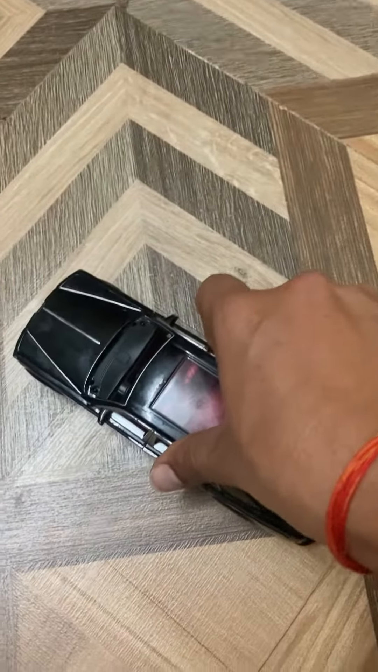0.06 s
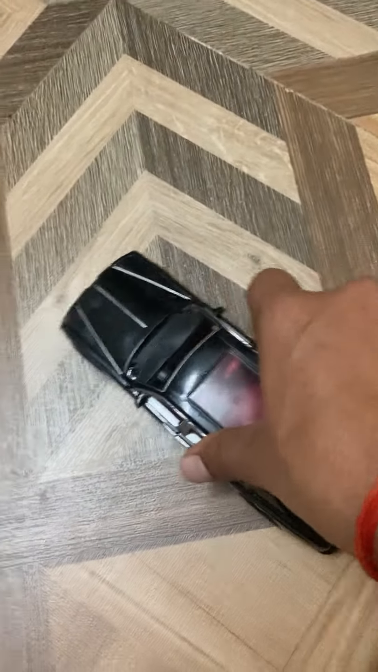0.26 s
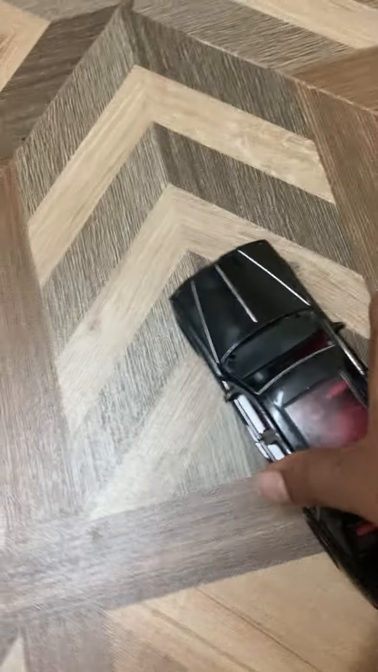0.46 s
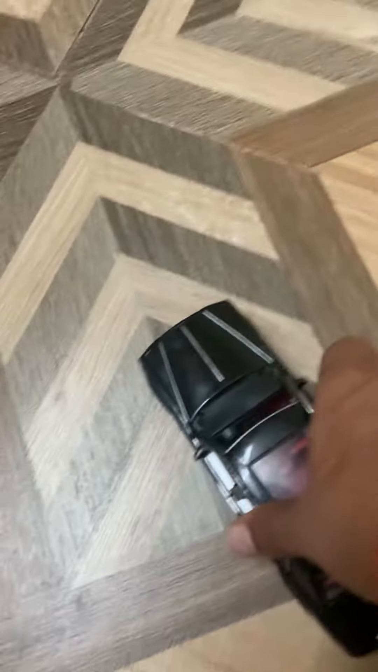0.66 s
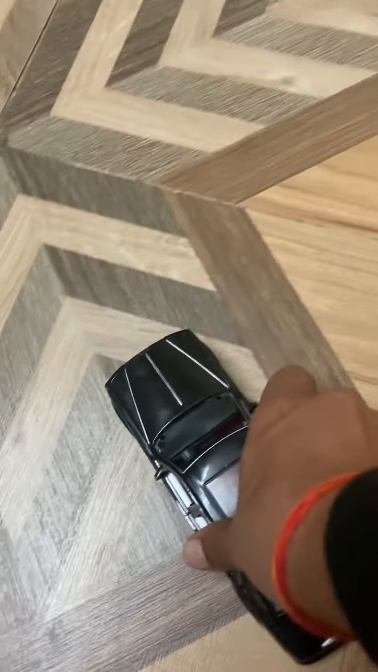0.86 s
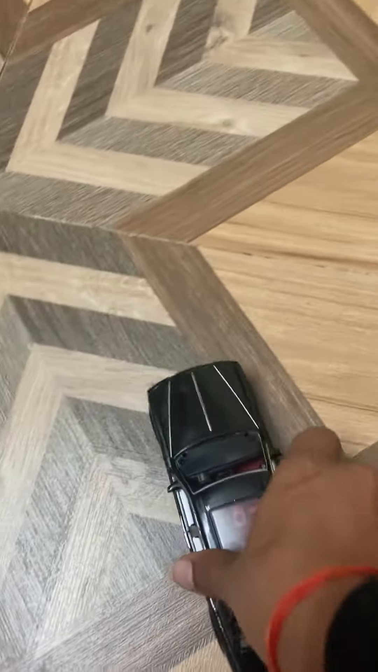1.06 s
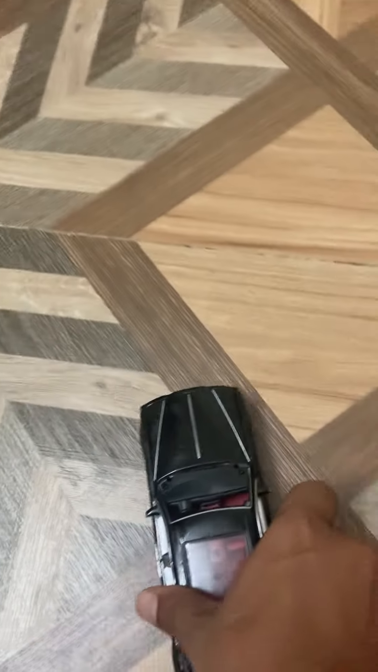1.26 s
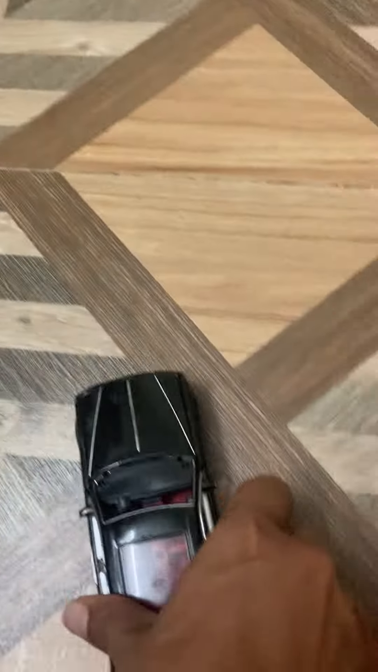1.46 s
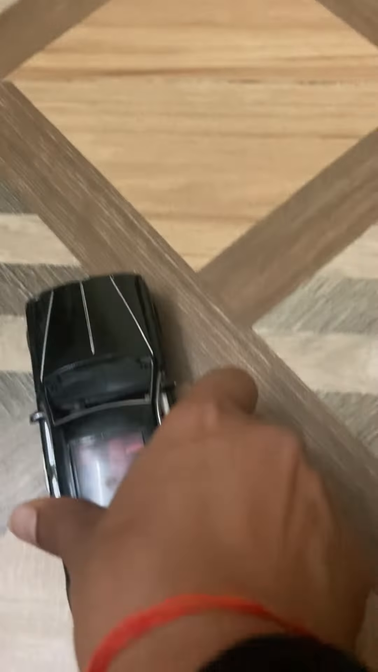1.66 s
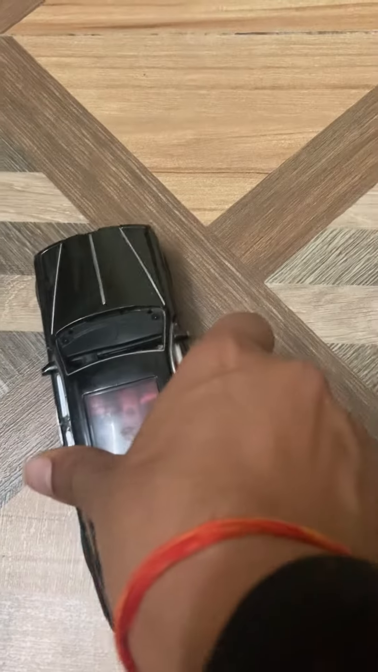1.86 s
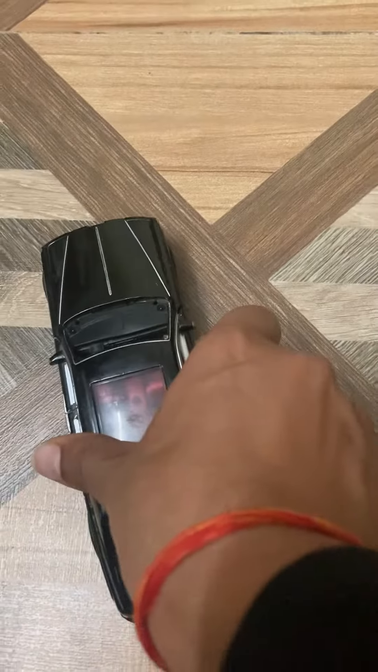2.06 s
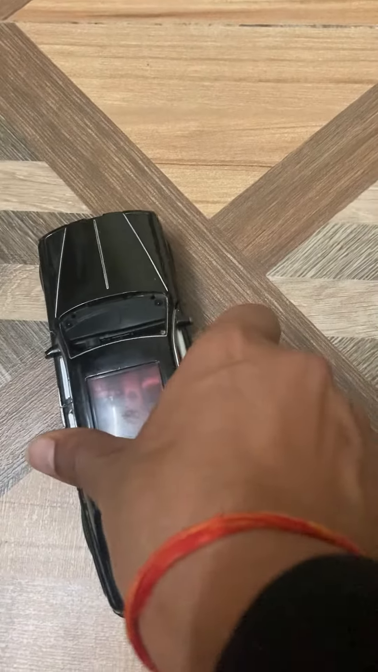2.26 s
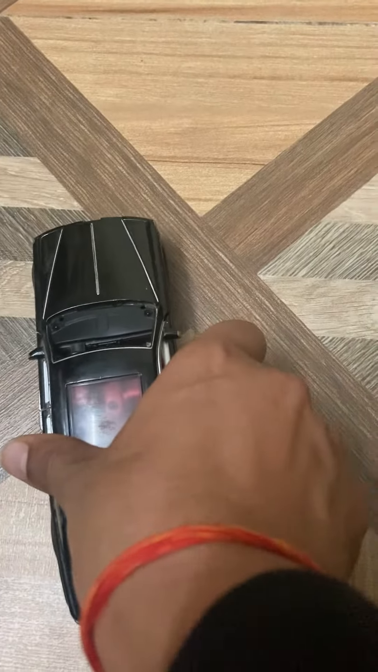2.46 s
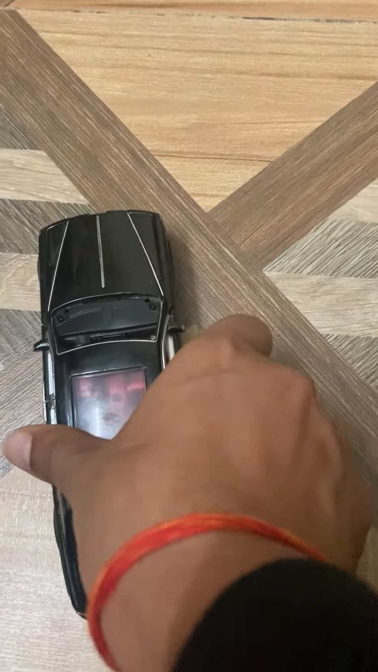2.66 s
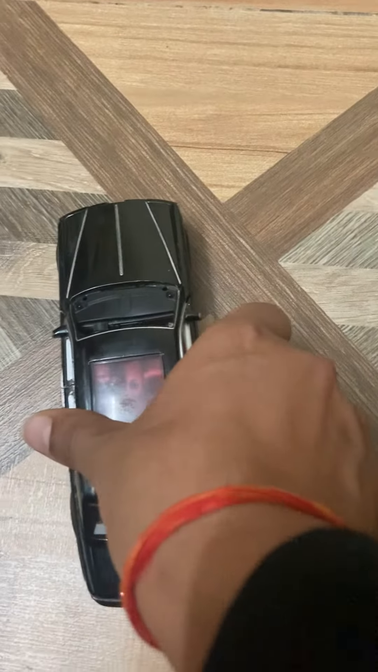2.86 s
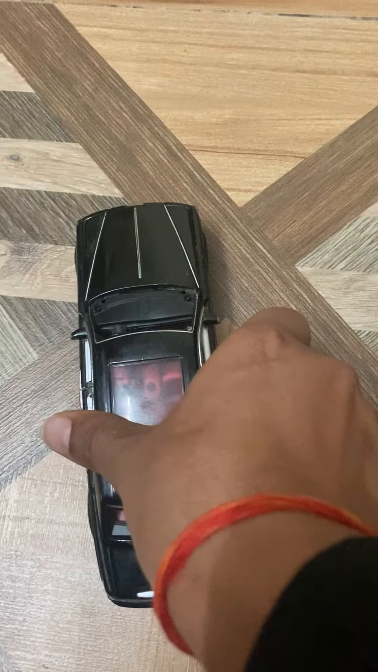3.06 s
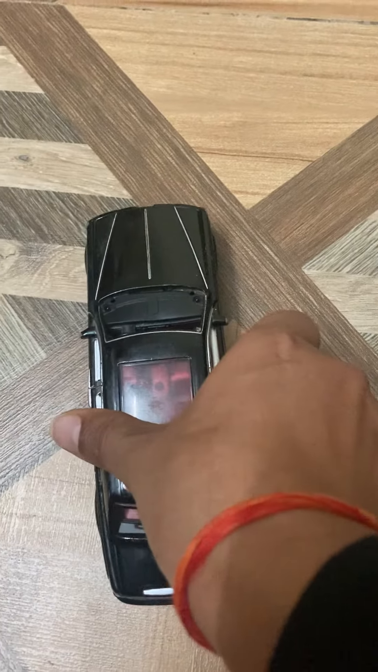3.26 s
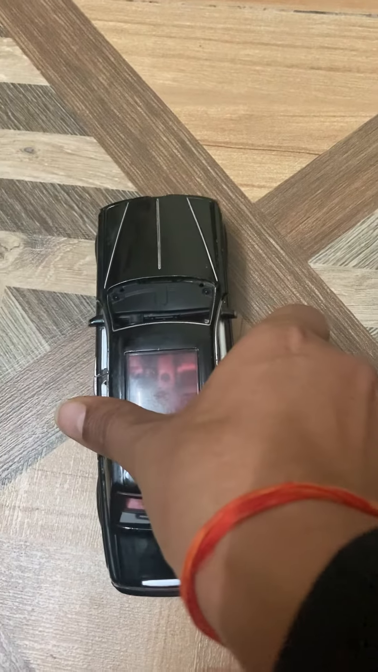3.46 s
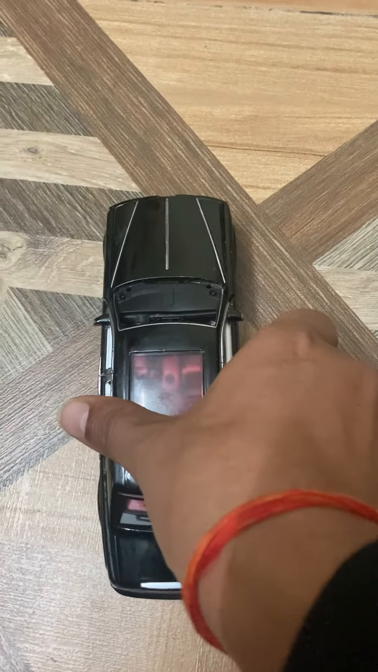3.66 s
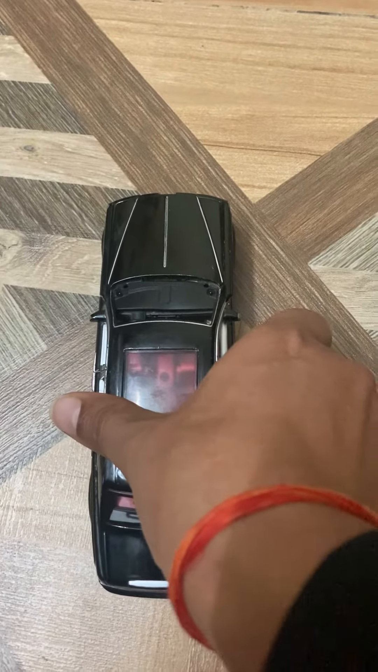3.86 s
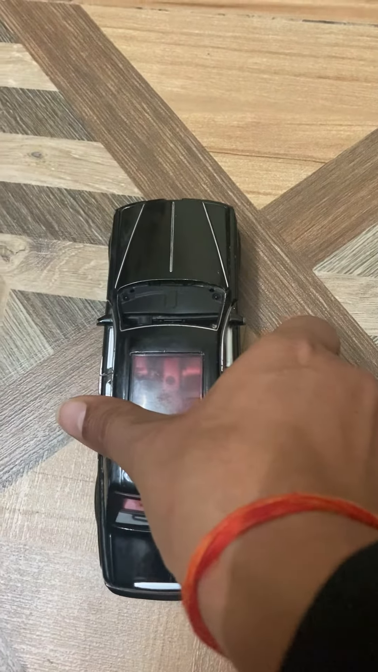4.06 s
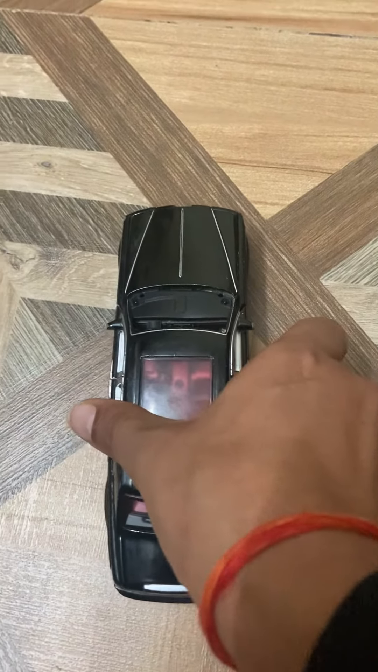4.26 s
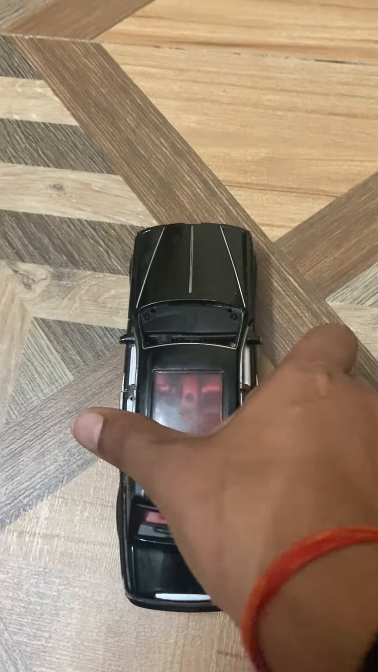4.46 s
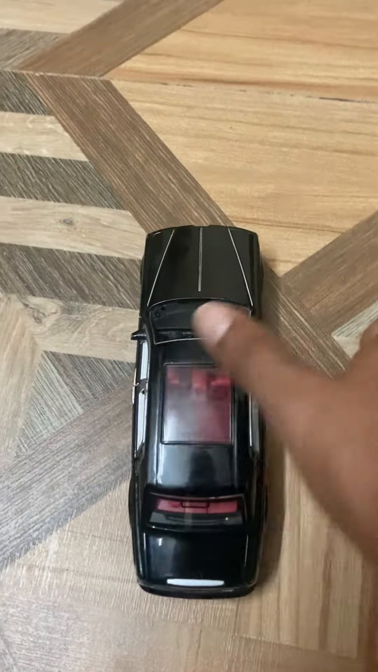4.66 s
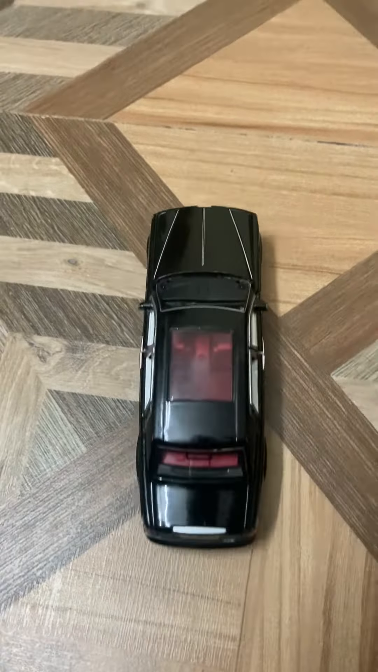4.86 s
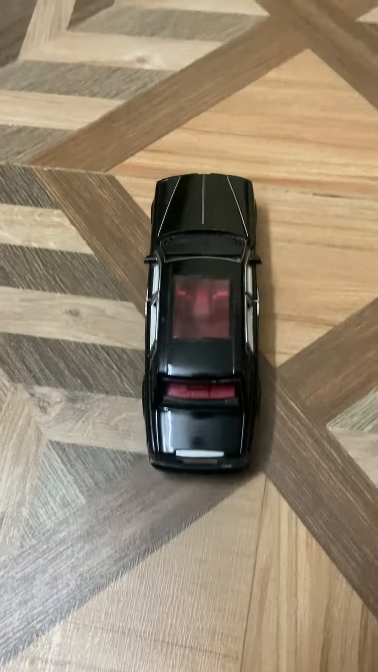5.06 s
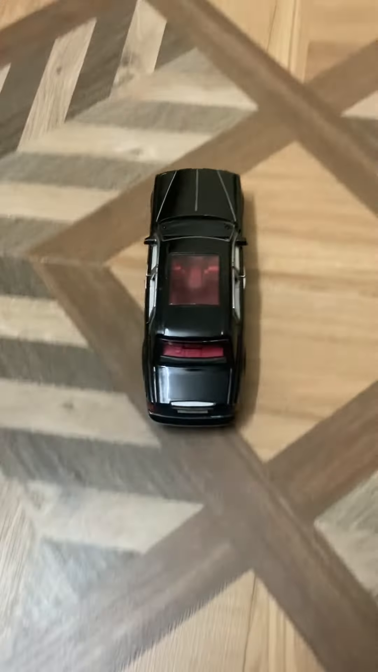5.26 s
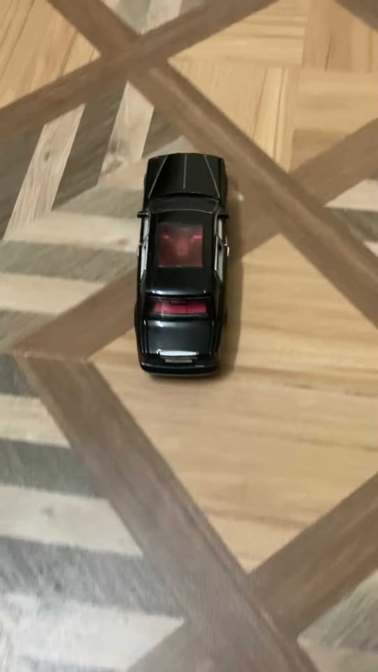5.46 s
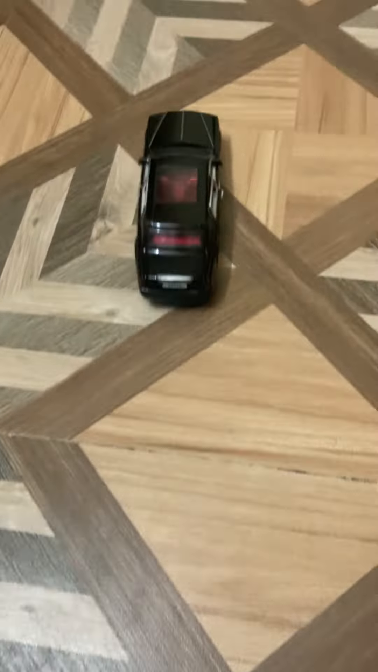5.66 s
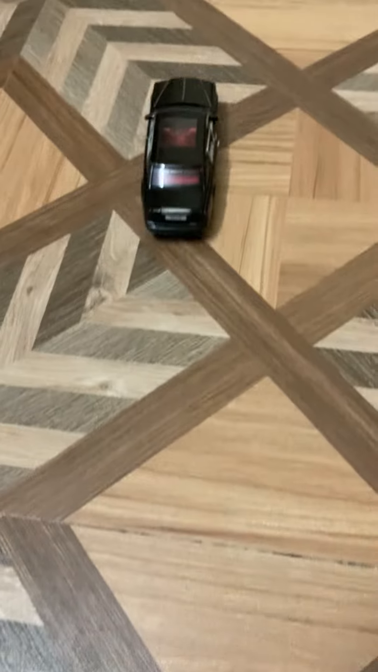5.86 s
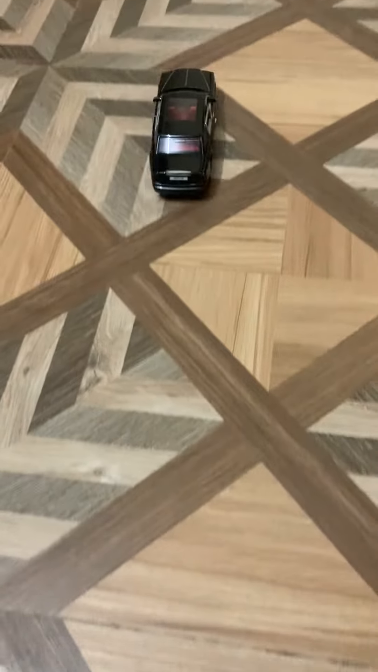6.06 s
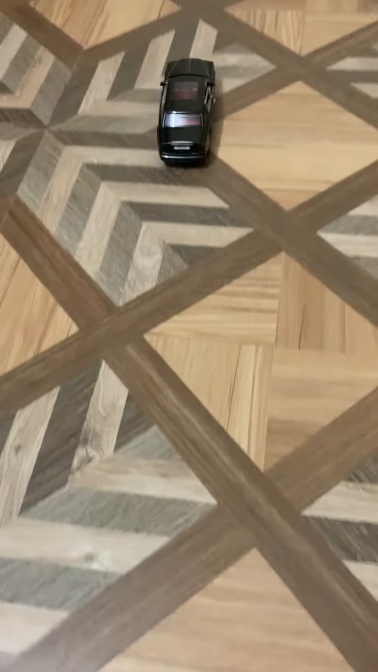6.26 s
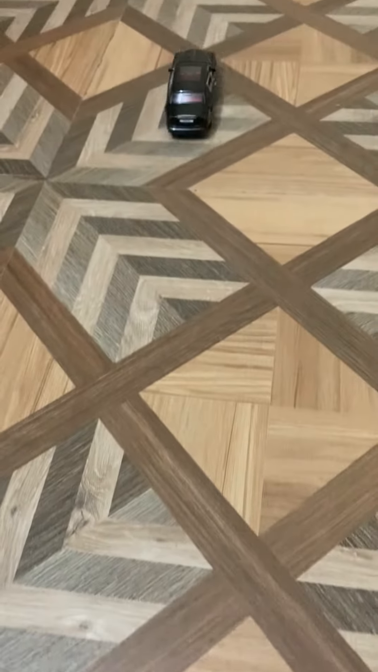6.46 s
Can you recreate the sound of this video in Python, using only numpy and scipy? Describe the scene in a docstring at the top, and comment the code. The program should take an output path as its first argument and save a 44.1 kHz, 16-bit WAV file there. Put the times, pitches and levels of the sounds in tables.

```python
"""A pull-back toy car on a hard floor, close to a phone's two microphone ports. It is dragged back until
the tyres skid and squeal, held while its plastic shell ticks and creaks under the fingers, then let go:
gears and wheels rattle in the hollow shell as the spring takes it up to speed.
Soft swishes come and go. Behind, a quiet room rumbles, with one low bump and faint far-off tones."""
import sys
import numpy as np
from scipy import signal
from scipy.fft import rfft, irfft, next_fast_len
from scipy.io import wavfile
from scipy.ndimage import uniform_filter1d, map_coordinates

SR = 44100
rng = np.random.default_rng(int(sys.argv[2]) if len(sys.argv) > 2 else 0)


def generate_wav(sig):
    """Save sig (samples, or channels by samples) to the path in sys.argv[1] as 16-bit PCM at SR."""
    pcm = np.round(np.clip(np.atleast_2d(sig).T, -1, 1) * 32767).astype(np.int16)
    wavfile.write(sys.argv[1], SR, pcm)


N = 287602
TIME = np.arange(N) / SR

# The car let go, close to the microphone: (time [s], shell level [dB])
RUN_LEVELS = [(4.52, -68.5), (4.62, -53.5), (4.7, -53), (4.79, -37), (4.9, -44.5), (5.05, -45.5),
              (5.11, -50), (5.18, -37), (5.42, -32), (5.53, -35.5), (5.72, -33), (5.9, -37), (5.99, -34),
              (6.15, -35), (6.31, -33), (6.52, -37.5)]
# Colour of the rolling hiss: (frequency [Hz], gain [dB])
ROLLING_SPECTRUM = [(2500, -45.5), (4200, 3), (5500, -4), (7000, -6.5), (8600, -3.5), (11000, -3.5),
                    (13500, -8.5), (15000, -65.5), (16000, -50)]
# Gear teeth meeting: (time [s], mesh rate [Hz])
MESH_RATE = [(5.15, 425.5), (5.3, 441), (5.7, 488), (6.26, 551.5), (6.52, 567)]
RELEASE_S, SPEED_UP_S = 4.295, 1
def running():
    """Loose gears and axles chatter and whine, the treble in clumps; the wheels rumble on the floor."""
    speed = 1 - np.exp(-(np.maximum(TIME - RELEASE_S, 0) / SPEED_UP_S) ** 2)
    halvings = -np.log2(speed + 1e-9)  # each halving of speed takes a fixed step off the levels
    body, = gains(RUN_LEVELS)
    chatter = grit(1200, 1.5, 1.2) * amp(1.2 * wobble(70))
    hiss = coloured(unit(chatter) + 0.099 * noise(), ROLLING_SPECTRUM) * amp(2.2 * wobble(45))
    wheels = unit(filtered(noise(), band(609.3, 196)) * amp(wobble(5.44)))
    teeth = unit(filtered(chatter, band(3630, 2300)) * amp(0.88 * wobble(7.1)))
    mesh = whine(*np.transpose(MESH_RATE), [(2, -10), (3, -4), (4, 2.5)], blur=0.04, flutter_db=3)
    rattle = amp(0.36 * wobble(8.6)) * unit(filtered(chatter, shell))
    return (body * rattle + amp(-41 - 12.5 * halvings) * mesh + amp(-48.5 - 12.8 * halvings) * hiss
            + amp(-56 - 11.7 * halvings) * wheels + amp(-58 - 1.4 * halvings) * teeth)


# Close ticks of the plastic: (time [s], level [dB], knock offset [dB], crack offset [dB])
PLASTIC_TICKS = [(0.6926, -23, -7, 1), (0.9902, -27.5, 3, -8), (0.9946, -35, 8, -17.5),
                 (1.03, -35.5, 0, -4.5), (2.0326, -52.5, -10, -8), (2.2776, -53, 14, -25),
                 (2.6218, -44.5, -12.5, -13), (2.729, -49, -37, -8.5), (2.772, -46, -33, -8.5),
                 (3.276, -40.5, -20, -7), (3.3924, -43, -28, -5), (3.458, -44, -8.5, -6.5),
                 (3.583, -41, -16, -7.5), (3.659, -66, 25, -30.5), (3.6617, -65, 28.5, -42),
                 (3.8952, -50.5, -9, -29.5), (3.96, -51.5, -9, -14.5), (4.0594, -36.5, -16.5, -10.5),
                 (4.077, -46, -21, -25), (4.1293, -40.5, -24, -6.5), (4.222, -44, -9, -11.5),
                 (4.3884, -42, -20.5, -11), (4.5602, -49, 11, -12), (4.6433, -44, -44, -14),
                 (4.655, -37, 0.5, -13), (4.712, -51, 9, -22), (4.778, -45, 13, -35), (4.796, -53, 14, -35),
                 (4.8125, -46.5, 13, -18.5), (4.8459, -32.5, -3.5, -26.5), (4.869, -41, 13.5, -14),
                 (4.927, -42, 8, -16), (4.948, -44, 8, -8), (4.9735, -38, 8.5, -12.5),
                 (5.0004, -37.5, 10.5, -22), (5.0314, -40, -5, 3), (5.0485, -46, 4.5, -8),
                 (5.082, -48.5, 12.5, -10), (5.118, -40, 5.5, 0), (5.132, -39, 16.5, -24),
                 (5.17, -40.5, 17.5, -25), (5.193, -49.5, -14, 2.5), (5.2067, -40, 13, -20),
                 (5.2228, -42, 2, 3.5), (5.238, -39, 2, -1), (5.2539, -34, 3, 1.5),
                 (5.2776, -36, 9.5, -5.5), (5.3065, -35, -4, -7), (5.3224, -40.5, 18, -17),
                 (5.377, -47.5, 2, -12.5), (5.398, -42, 15, -2), (5.435, -27, 0.5, -11),
                 (5.4867, -30, -2, -7), (5.5136, -39, 9, 1), (5.5647, -44.5, 2, 0.5),
                 (5.572, -38.5, 14, -15), (5.6112, -36.5, 9, -10.5), (5.658, -40.5, 10.5, -17),
                 (5.7067, -38, 5, -16.5), (5.7218, -31, 3.5, -8), (5.7452, -34.5, 1, -6),
                 (5.762, -40, 5.5, -1.5), (5.801, -46, 16.5, -13.5), (5.8478, -42.5, 12, -17),
                 (5.879, -41, 16.5, -3.5), (5.9318, -46, 10.5, -10), (5.9537, -43, -5, -1),
                 (5.985, -27, 1.5, -9.5), (6.0362, -36, -2, -3.5), (6.0988, -31.5, 2.5, -6),
                 (6.28, -43.5, 1, -3.5), (6.294, -40.5, 2, 5), (6.3408, -41.5, 11, -5.5),
                 (6.3951, -36, 3.5, -2.5), (6.4468, -37, 18.5, -13.5), (6.455, -37.5, -11.5, 0),
                 (6.5039, -38.5, 4.5, 2.5)]
DRAG_END_S, ROLLING_S, KNOCK_GAIN_DB = 1.6, 5.1, 15
def ticks():
    """Each tick is a knock that rings the shell, a snap and a crack, duller once the car rolls off."""
    t = np.arange(SR // 12) / SR
    spike, fuzz = 1.6 * decay(t, 0.007), 0.1 * decay(t, 0.2)
    knock, snap, near, far = np.zeros((4, N + len(t)))
    for start, db, knock_db, crack_db in PLASTIC_TICKS:
        envelope = spike + decay(t, 0.09 if start < DRAG_END_S else 0.05) + fuzz
        bursts = np.sign(rng.standard_normal((3, len(t)))) * envelope
        span = round(start * SR) + np.arange(len(t))
        knock[span] += amp(db + knock_db + KNOCK_GAIN_DB) * decay(t, 0.0044) * bursts[0]
        snap[span] += amp(db - 0.5) * bursts[1]
        crack = near if start < ROLLING_S else far
        crack[span] += amp(db + crack_db) * decay(t, 0.048) * bursts[2]
    return (filtered(knock, shell) + filtered(snap, band(2550, 2640))
            + filtered(near, band(12060, 8700)) + filtered(far, band(9060, 4800)))


# Modes of the car's hollow body: (frequency [Hz], width [Hz], gain [dB])
SHELL_MODES = [(1017, 26, -11.5), (1098, 44, -11), (1316, 54.5, -0.5), (1416, 52, 0), (1644, 180, -2),
               (1880, 51.5, 0), (2017.3, 143, -4.5), (2288.8, 73, -4), (2398, 99, -8), (2837, 400, -7.5),
               (3280, 380, -12)]
def shell(f):
    """Response of the hollow body, too small to radiate bass below about 800 Hz."""
    return modes(SHELL_MODES, f) * f * f / (f * f - 1.2j * f * 800 - 800 ** 2)


# The car pulled back, close by: (time [s], shell level [dB], tyre hiss level [dB])
DRAG_LEVELS = [(0.03, -100, -100), (0.16, -54.5, -61), (0.352, -53.5, -55.5), (0.48, -53, -59),
               (0.58, -63, -47.5), (0.72, -61, -45), (1.018, -46, -48.5), (1.164, -47, -49.5),
               (1.3, -59.5, -51.5), (1.49, -53, -50.5), (1.54, -50, -58.5), (1.63, -61.5, -65.5),
               (1.9, -78.5, -81)]
# Tyres rubbing on the hard floor: (frequency [Hz], gain [dB])
TYRE_SPECTRUM = [(500, -14), (800, -8), (1500, -6.5), (3500, 1.5), (4500, 2), (6000, -4), (8500, -5),
                 (11500, -4), (14000, -8), (15200, -14.5), (16000, -46.5)]
def drag():
    """The winding gears shake the shell, the wheels scrape and the tyres hiss on the floor."""
    body, hiss = gains(DRAG_LEVELS)
    gears = unit(filtered(noise(), shell))
    scrape = unit(filtered(grit(830, 1.6, 1.8), band(1400, 1640)))
    return body * unit(gears + amp(-3.5) * scrape) + hiss * coloured(noise(), TYRE_SPECTRUM)


# Rubber sliding on the floor: (frequency [Hz], gain [dB])
SKID_SPECTRUM = [(900, -49), (1400, -2), (2500, -3.5), (4000, -6.5), (5800, 3), (7500, -12), (9000, -10.5),
                 (11000, 0), (12500, -3.5), (14500, -15), (16000, -21.5)]
LOCK_S, STOP_S, SWELL_DB_PER_S = 1.208, 1.488, 19
def skid():
    """The tyres lock and slide: the rasp grabs at once, swells and breaks off."""
    rasp = patchy(coloured(grit(3000, 1.0, 1.1) * amp(1.5 * wobble(70)), SKID_SPECTRUM), depth_db=2.5)
    after = np.maximum(TIME - STOP_S, 0)
    grab_db = -1500 * np.maximum(LOCK_S - TIME, 0)
    break_db = -9 * np.clip(after / 0.01, 0, 1) - 170 * after
    return amp(-38 + grab_db + SWELL_DB_PER_S * (TIME - LOCK_S) + break_db) * rasp


def chirps(count=60, length_s=0.007):
    """Sliding rubber grips and lets go in many tiny squeaks that grow with the skid."""
    starts = rng.uniform(LOCK_S, STOP_S, count)
    hz = 9500 * rng.normal(1, 0.08, count)
    db = rng.normal(-47, 2, count) + SWELL_DB_PER_S * (starts - LOCK_S)
    return squeaks(zip(starts, np.full(count, length_s), hz, 0.98 * hz, db))


# The tyres at the end of the skid: (time [s], pitch [Hz], level [dB])
SQUEAL_PATH = [(1.384, 3206, -61), (1.405, 3100, -41), (1.424, 2950, -29.5), (1.443, 2130, -35.5),
               (1.458, 1822, -29), (1.476, 1503, -39.5), (1.498, 1456, -40.5), (1.506, 1406, -50)]
def squeal():
    """The skidding rubber gives one rough, falling tone."""
    times, hz, db = np.transpose(SQUEAL_PATH)
    level, = gains(np.transpose([times, db]))
    return level * whine(times, hz, [(1, 0.016)], blur=0.06, flutter_db=5.5)


# Rubber and axles, close by: (time [s], length [s], start pitch [Hz], end pitch [Hz], level [dB])
CAR_SQUEAKS = [(1.255, 0.0166, 6500, 6600, -33.5), (1.29, 0.085, 1500, 1444, -44.5),
               (1.31, 0.073, 5630, 5400, -33), (1.345, 0.046, 5650, 4408, -40),
               (1.384, 0.0112, 6700, 6660, -38), (1.399, 0.018, 6600, 6390, -32.5),
               (1.405, 0.027, 9400, 8700, -42.5), (1.445, 0.039, 8900, 8320, -41.5),
               (1.446, 0.049, 3650, 3579, -40), (1.565, 0.017, 1460, 1340, -45.5),
               (4.45, 0.14, 4230, 4690, -73), (4.53, 0.22, 4815, 4600, -51.5),
               (4.556, 0.023, 3516, 3390, -48.5), (4.572, 0.02, 2650, 2660, -42),
               (4.595, 0.027, 1897, 1810, -45.5), (4.645, 0.0137, 3600, 3630, -48),
               (4.688, 0.05, 3350, 3490, -44), (4.7, 0.027, 1768, 1712, -32),
               (4.765, 0.043, 1576, 1550, -32.5), (4.855, 0.06, 8170, 8290, -47.5),
               (4.908, 0.022, 4000, 4100, -60)]
def squeaks(rows):
    """Rubber and axles squeak in short, raspy glides."""
    return glides(rows, blur=0.016, flutter_db=4)


# Scrapes on the plastic: (time [s], length [s], shell level [dB], rasp level [dB], hiss level [dB])
PLASTIC_RUBS = [(2.277, 0.16, -54, -69, -84), (2.447, 0.39, -81, -68, -81), (3.283, 0.057, -74, -66, -68),
                (3.398, 0.11, -56.5, -65, -71), (3.598, 0.044, -63.5, -67, -71),
                (3.662, 0.068, -56, -69, -95.5), (4.07, 0.055, -65.5, -64, -66.5),
                (4.127, 0.066, -63.5, -53, -56.5), (4.199, 0.0853, -65, -64, -77),
                (4.549, 0.041, -71, -48.5, -52.5), (4.641, 0.0116, -40.5, -45, -48),
                (4.69, 0.05, -43, -53, -59.5), (4.768, 0.0175, -47, -68, -59),
                (4.839, 0.045, -39, -68, -53), (4.901, 0.0106, -37.5, -42.5, -70),
                (5.109, 0.012, -34, -71.5, -50), (5.359, 0.14, -48, -41.5, -48)]
# Hiss of those scrapes: (frequency [Hz], gain [dB])
RUB_SPECTRUM = [(2500, -16.5), (4500, -17), (6500, 0.5), (9000, -10), (12000, 1), (14200, -7), (15500, -37)]
def rubs():
    """Fingers and gears scrape the plastic: dense slips break loose, sag and stop as the grip returns."""
    stick = np.cumsum(140 * (1 + 0.18 * wobble(30))) / SR % 1  # stick-slip cycles make the buzz
    slips = grit(700, 0.3, 0.96) * amp(-7 * stick)
    ring, rasp = unit(filtered(slips, shell)), unit(filtered(slips, band(2940, 2160)))
    voices = np.array([ring, rasp, coloured(slips, RUB_SPECTRUM)])
    out = 0
    for start, length, *db in PLASTIC_RUBS:
        age = TIME - start
        rise = np.clip(age / 0.003, 0, 1)
        fall = amp(-4 * np.clip(age / length, 0, 1) - 600 * np.clip(age - length, 0, 1))
        out += rise * fall * (amp(db) @ voices)
    return out


# Modes of the gripped side panel: (frequency [Hz], width [Hz], gain [dB])
PANEL_MODES = [(2110, 200, 1.5), (2646, 300, -3.5), (3410, 440, -6.5), (4600, 700, -14)]
def creak(start_s=4.1478, first_gap_s=0.0073, gap_ratio=0.96, count=7):
    """A finger judders along the side panel, each slip a short burst that rings it."""
    onsets = start_s + first_gap_s * (1 - gap_ratio ** np.arange(count)) / (1 - gap_ratio)
    envelope = sum((TIME >= s) * amp(rng.normal()) * decay(np.abs(TIME - s), 0.012) for s in onsets)
    slips = envelope * np.sign(noise())
    ring = unit(filtered(slips, lambda f: modes(PANEL_MODES, f)))
    hiss = unit(filtered(slips, band(10000, 8000)))
    time_share = count * first_gap_s * SR / N  # sets the levels over the creak's own length
    return (amp(-50) * ring + amp(-62) * hiss) * np.sqrt(time_share)


# Soft swishes; the last is a thin, hissy squeak as the car is let go:
# (time [s], length [s], centre [Hz], half-width [Hz], level [dB])
SOFT_SWISHES = [(1.585, 0.5, 3805, 1750, -58.5), (1.948, 0.29, 4800, 797, -72.5),
                (2.268, 0.903, 5100, 870, -70), (2.396, 0.56, 3257, 810, -63),
                (2.909, 0.44, 3630, 760, -61), (4.597, 0.45, 4800, 300, -60.5)]
def swishes():
    """Bands of noise swell quickly and fade slowly."""
    out = 0
    for start, length, hz, width, db in SOFT_SWISHES:
        hush = unit(filtered(noise(), lambda f: np.exp(-((f - hz) / width) ** 2)))
        progress = np.clip((TIME - start) / length, 0, 1)
        out += amp(db) * np.sin(np.pi * progress ** 0.52) ** 2 * hush
    return out


# The quiet room behind the car: (time [s], bass level [dB], air level [dB])
ROOM_LEVELS = [(0.0, -66, -67), (0.5, -70.5, -63), (1.2, -71.5, -71.5), (1.8, -71.5, -67.5),
               (2.3, -72, -68), (2.8, -67.5, -69.5), (3.3, -74.5, -70.5), (3.9, -71.5, -69.5),
               (4.8, -71, -70.5), (5.7, -72.5, -68), (6.52, -76, -70)]
# Its bass rumble: (frequency [Hz], gain [dB])
BASS_SPECTRUM = [(15, -66), (25, -20), (59, 0), (75, 1), (97, -7), (124, -2.5), (151, -9), (206, -0.5),
                 (249, -8), (350, -14.5), (460, -24.5), (770, -120)]
# Its airy hush: (frequency [Hz], gain [dB])
AIR_SPECTRUM = [(150, -59.5), (250, -9.5), (460, -4.5), (686, -11.5), (761, -7.5), (1550, -21),
                (1670, -18.5), (3400, -23.5), (4730, -18.5), (5630, -31), (16000, -32)]
def room():
    """Room tone: a wavering rumble, one soft low bump and a patchy hush."""
    bass, air = gains(ROOM_LEVELS)
    rumble = amp(2 * wobble(5.3)) * coloured(noise(), BASS_SPECTRUM)
    bump = amp(-54) * np.exp(-((TIME - 0.905) / 0.021) ** 2) * np.sin(2 * np.pi * 75 * TIME)
    hush = amp(0.64 * wobble(5.2)) * patchy(coloured(noise(), AIR_SPECTRUM), depth_db=2.85)
    return bass * rumble + bump + air * hush


# Far from the microphone: (time [s], length [s], start pitch [Hz], end pitch [Hz], level [dB])
FAR_TONES = [(-.1, 0.58, 641, 652, -71.5), (-.1, 0.85, 501.6, 499, -67.5), (.1, 1, 253.5, 228.6, -67.5),
             (.33, 0.46, 754, 701, -64.5), (3.75, 0.977, 797, 790, -74), (4.1, 0.78, 1619, 1600, -73.5)]
def far_tones():
    """Faint unsteady tones, like horns in a distant street."""
    return glides(FAR_TONES, blur=0.013, flutter_db=4.32)


# Floor and wall echoes at the microphone: (frequency [Hz], share of power [0-1])
ECHO_SHARE = [(850, 0), (1100, .35), (1800, .75), (2400, .6), (3200, .4), (4200, .65), (5000, .45),
              (5600, .2), (6200, .3), (7400, .4), (8400, .05), (10000, .25), (11700, .03), (13500, .45),
              (14500, .05)]
def echoes(x, t60_s=0.026, evenness=0.75):
    """Each port hears its own echoes, which change slowly as car, hand and phone move."""
    hz, _, spectra = signal.stft(x, SR, nperseg=1024)
    lag = np.arange(512)[:, None] / SR
    paths = uniform_filter1d(rng.standard_normal((2, len(lag), spectra.shape[1])), 7, 2)
    echo = rfft(paths * decay(lag, t60_s), 1024, axis=1)
    echo /= np.sqrt(np.mean(np.abs(echo) ** 2))
    share = along(ECHO_SHARE, hz)[:, None]
    ports = np.sqrt(1 - share) + np.sqrt(share) * echo
    ports /= np.abs(ports) ** evenness  # keeps the phase, flattens most of the level swings
    return signal.istft(spectra * ports, SR, nperseg=1024)[1][:, :N]


# Stereo phase difference between left and right: (frequency [Hz], phase difference [rad])
STEREO_PHASE = [(900, 0), (1400, -2.1), (2100, -2), (3400, -3.1), (4100, -4.6), (4800, -3.5), (5900, -3),
                (6900, -1.6), (7900, -.3), (8900, .2), (10000, 1.5), (11300, 3), (12100, 3.2), (13100, 4.3),
                (14100, 6.2), (15000, 6.28)]
# Stereo balance, left minus right: (frequency [Hz], level difference [dB])
STEREO_BALANCE = [(800, 0), (1300, -.6), (2400, -1.4), (4400, -.2), (8000, 0)]
def stereo_image(pair):
    """Bass is alike left and right; higher sound differs in phase and a little in level."""
    def response(f):
        left = np.exp(0.5j * along(STEREO_PHASE, f)) * amp(along(STEREO_BALANCE, f) / 2)
        return np.array([left, 1 / left])
    return filtered(pair, response)


def amp(db):
    return 10 ** (np.asarray(db) / 20)


def unit(x):
    return x / np.sqrt(np.mean(x ** 2) + 1e-20)


def noise():
    return rng.standard_normal(N)


def decay(t, t60_s):
    return amp(-60 * t / t60_s)


def along(points, hz):
    """Interpolate (frequency [Hz], value) points on a log axis."""
    f, values = np.transpose(points)
    return np.interp(np.log(hz + 1), np.log(f + 1), values)


def gains(rows):
    """One gain per sample for each dB column, silent outside the rows."""
    times, *columns = np.transpose(rows)
    return [amp(np.interp(TIME, times, db, -150, -150)) for db in columns]


def wobble(rate, n=N):
    """A smooth random curve, rate knots a second."""
    return map_coordinates(rng.standard_normal(int(n * rate / SR) + 4), [np.arange(n) * rate / SR])


def filtered(x, response):
    """x through a complex response of frequency."""
    size = next_fast_len(N + SR // 2)
    return irfft(rfft(x, size) * response(np.fft.rfftfreq(size, 1 / SR)), size)[..., :N]


def coloured(x, spectrum):
    return unit(filtered(x, lambda hz: amp(along(spectrum, hz))))


def resonance(f, hz, width):
    return 1j * f * width / (hz * hz - f * f + 1j * f * width)


def band(hz, width):
    """A broad resonance applied twice."""
    return lambda f: resonance(f, hz, width) ** 2


def modes(rows, f):
    """Resonances summed with alternating sign."""
    return sum((-1) ** k * amp(db) * resonance(f, hz, width) for k, (hz, width, db) in enumerate(rows))


def grit(rate, spread_db, smooth):
    """Contacts of uneven size at random moments, over a share of smooth noise."""
    hits = (rng.random(N) < rate / SR) * amp(spread_db * rng.exponential(size=N)) * noise()
    return unit(hits) + smooth * noise()


def patchy(x, depth_db):
    """Narrow bands swell and hollow out at random."""
    spectra = signal.stft(x, nperseg=512)[2]
    field = uniform_filter1d(uniform_filter1d(rng.standard_normal(spectra.shape), 2, 0), 12, 1)
    return unit(signal.istft(spectra * amp(depth_db * unit(field)), nperseg=512)[1][:N])


def glides(rows, blur, flutter_db):
    """Gliding tones that swell, flutter and fade; blur is the relative unsteadiness of pitch."""
    out = np.zeros(N + 2 * SR)
    for start, length, hz0, hz1, db in rows:
        u = np.linspace(0, 1, int(length * SR))
        hz = (hz0 + (hz1 - hz0) * u) * (1 + blur * wobble(147.7, len(u)))
        swell = amp(db + flutter_db * wobble(300, len(u))) * np.abs(np.sin(np.pi * u)) ** 0.7
        out[SR + round(start * SR):][:len(u)] += swell * np.sin(2 * np.pi * np.cumsum(hz) / SR)
    return out[SR:SR + N]


def whine(times, pitches, orders, blur, flutter_db):
    """Unsteady multiples of a moving pitch; orders are (multiple, level [dB])."""
    hz, out = np.interp(TIME, times, pitches), 0
    for multiple, db in orders:
        level = amp(db + flutter_db * wobble(120))
        cycles = np.cumsum(hz * (1 + blur * wobble(200))) / SR
        out += level * np.sin(2 * np.pi * multiple * cycles)
    return out


def scene():
    """The car close up and the room behind it, in stereo."""
    car = running() + ticks() + drag() + skid() + chirps() + squeal()
    car += squeaks(CAR_SQUEAKS) + rubs() + creak()
    return stereo_image(echoes(car + room() + swishes() + far_tones()))


def record(dry):
    """The microphone droops at the very top and passes nothing above 15.8 kHz."""
    return filtered(dry, lambda hz: (hz < 15800) / np.sqrt(1 + (hz / 14800) ** 30))


dry = scene()
out = record(dry)
generate_wav(out)
```